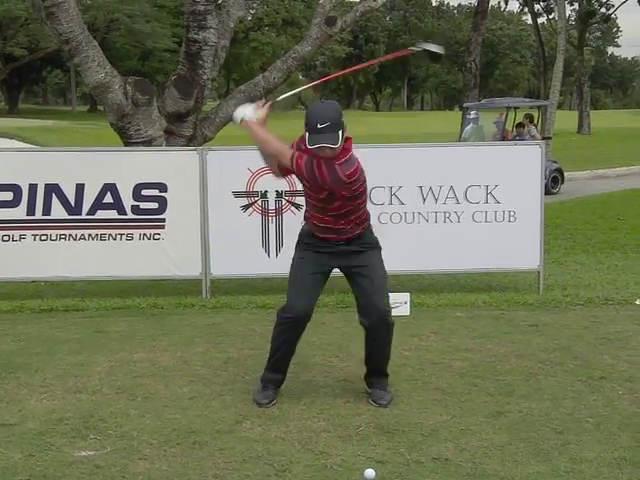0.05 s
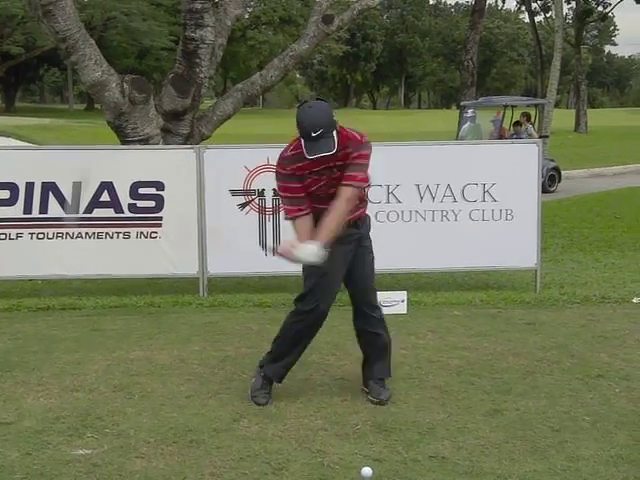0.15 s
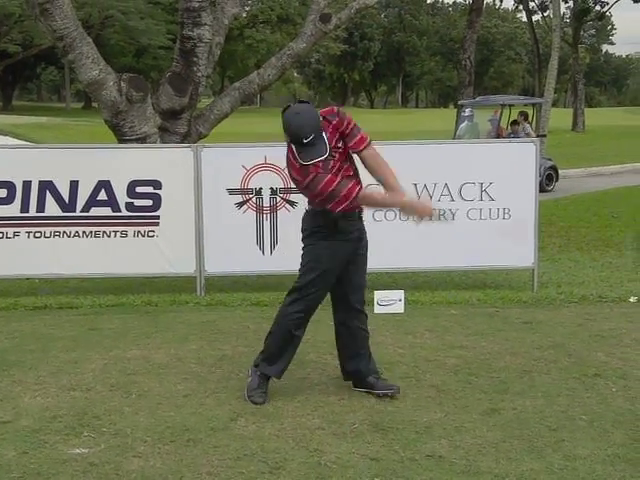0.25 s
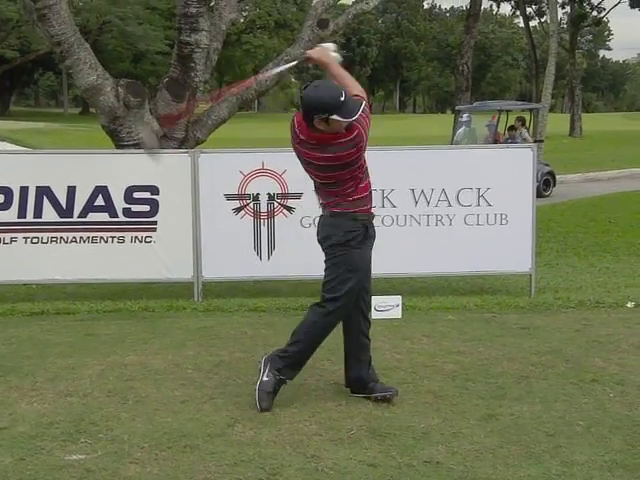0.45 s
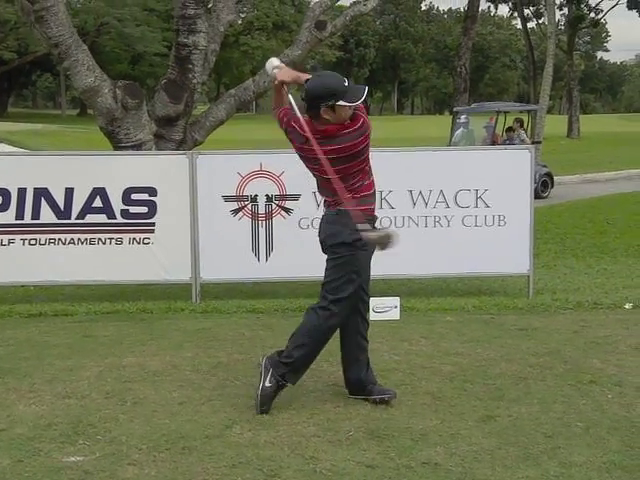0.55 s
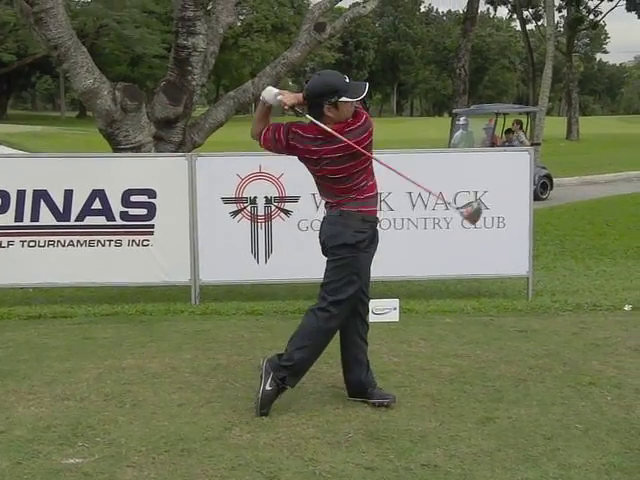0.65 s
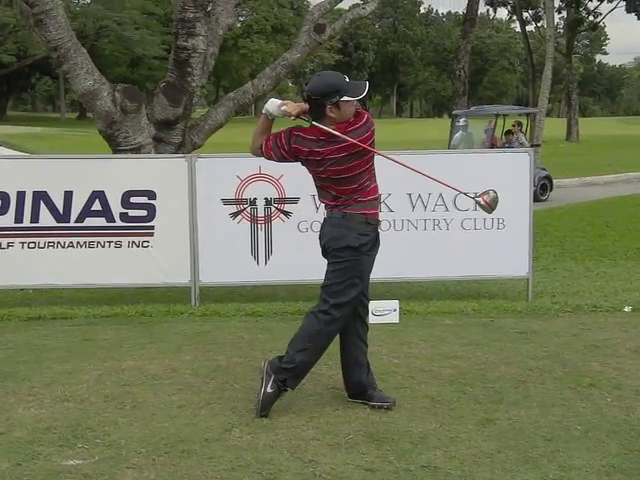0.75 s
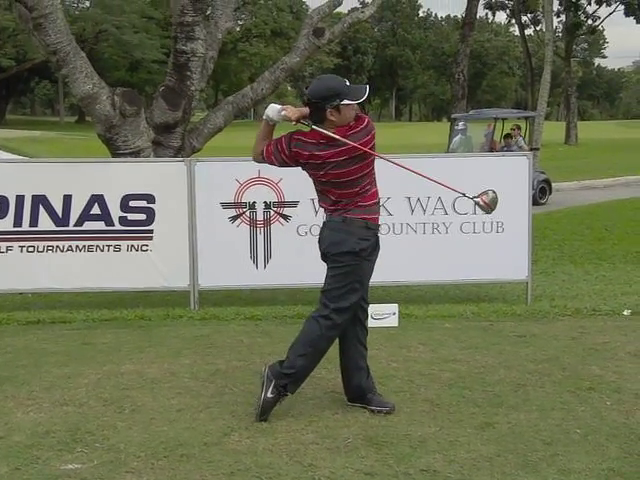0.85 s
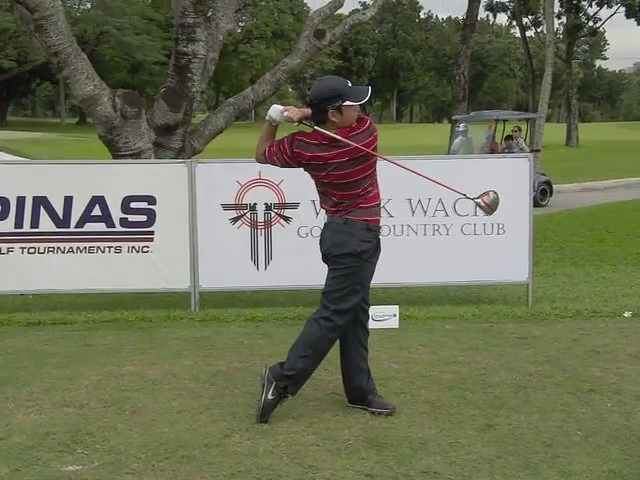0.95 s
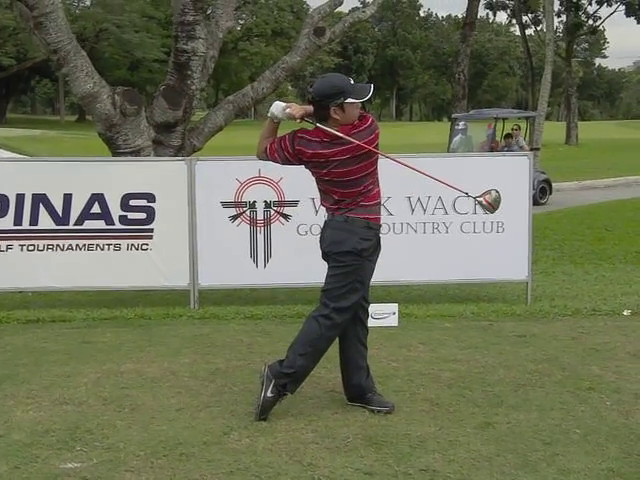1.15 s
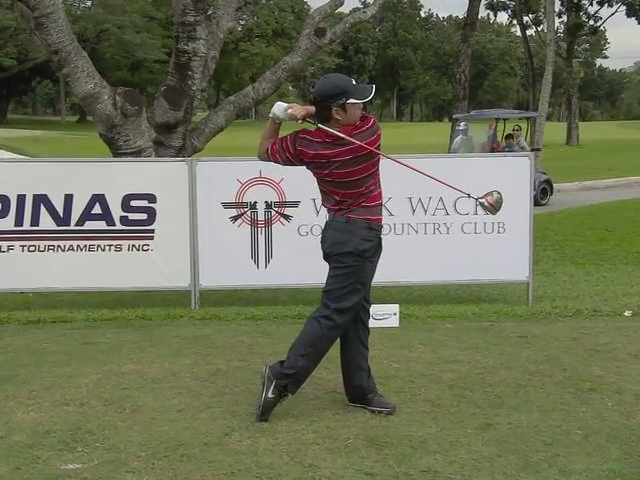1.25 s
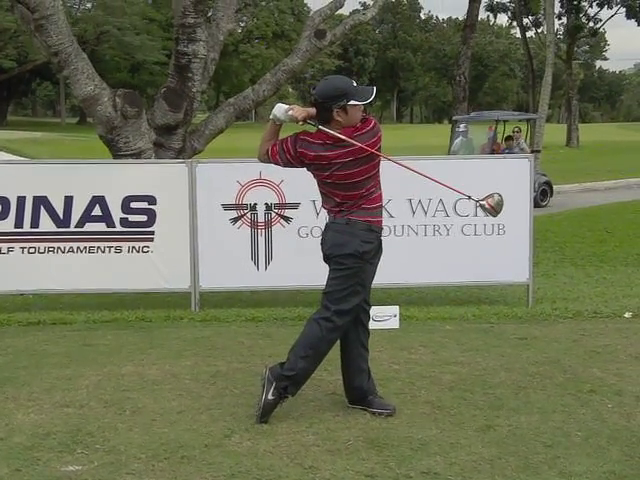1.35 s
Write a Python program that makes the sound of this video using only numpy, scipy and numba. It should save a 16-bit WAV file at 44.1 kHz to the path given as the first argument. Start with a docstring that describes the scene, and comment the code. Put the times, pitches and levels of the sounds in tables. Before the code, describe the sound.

One sharp crack of a golf drive outdoors, after a quick swish, over soft wind rumble.

```python
"""A golfer hits a drive on an open course. Light wind bumps the microphone over a faint outdoor hiss.
The shaft swishes down, shedding little swirls of air. The hollow metal head cracks against the ball
and rings briefly, overloading the microphone, and the automatic gain turns everything down.
Nearby boards slap the crack back, the trees return a short tail, and the wind carries on."""
import sys
import numpy as np
from scipy import signal
from scipy.fft import rfft, irfft
from scipy.io import wavfile
from numba import njit

SR = 44100
rng = np.random.default_rng(int(sys.argv[2]) if len(sys.argv) > 2 else 0)


def transcribe(signal):
    """Save signal, clipped to [-1, 1], as a 16-bit WAV file at the path in sys.argv[1]."""
    frames = np.atleast_2d(signal).T
    limited = np.clip(frames, -1, 1)
    pcm = np.round(limited * 32767).astype(np.int16)
    wavfile.write(sys.argv[1], SR, pcm)


N = 61739
TIME = np.arange(N) / SR
SPECTRUM_HZ = np.arange(N // 2 + 1) * SR / N
IMPACT_S = .2341

# The club head's ringing tones: pitch_hz, relative_db, fade_s (time to fall by 60 dB)
HEAD_TONES = [(1620, -17, .035), (3157, -20.5, .05), (3608, -3, 0.023), (4060, -12, 0.11), (5311, -23, .11),
              (6110, -14, 0.047), (6960, -41, .75), (7050, -20, .05), (7230, -23.5, .075),
              (9170, -19, .035), (9780, -16.5, .03), (10600, -24.5, .07), (10690, -5.5, .02),
              (13790, -21, .03), (14510, -6, 0.018)]
# Tone colour of the crack: pitch_hz, relative_db
CRACK_COLOUR = [(150, -10.5), (600, -7.5), (1600, -7.5), (2500, -9.5), (3600, 7.5), (5500, -7), (8000, -5),
                (10500, 1), (12800, -12), (15000, -2.5)]

def strike():
    """The ball cracks against the club face and sets the hollow head ringing."""
    ringing = sum((-1) ** k * from_db(db) * ring(IMPACT_S, hz, fade_s)
                  for k, (hz, db, fade_s) in enumerate(HEAD_TONES))
    crack = noise(CRACK_COLOUR) * burst(IMPACT_S, fade_s=.017, hold_s=.0022)
    return from_db(-1.5) * ringing + from_db(-4.5) * crack


# The swish as the club speeds up and slows: time_s, level_db, pitch_hz
SWING = [(.11, -79, 420), (.168, -60, 557), (.180, -49.5, 600), (.196, -41, 775), (.217, -31.5, 1050),
         (.232, -37.5, 900), (.26, -52.5, 610), (.33, -91, 400)]
# Churned air behind the head: pitch_hz, relative_db
WAKE_COLOUR = [(100, -9), (200, 0), (400, 0), (1000, 2.5), (2000, -2.5), (3600, -2.5), (5500, -21),
               (10000, -21), (15000, -25.5)]

def swish():
    """Air swirls off the shaft, higher and louder with speed; the slower inner part sounds lower."""
    time_s, level_db, pitch_hz = np.transpose(SWING)
    level = from_db(np.interp(TIME, time_s, level_db))
    hz = np.interp(TIME, time_s, pitch_hz)
    outer, inner = whistle(hz), whistle(.67 * hz)
    shaft = low_pass(outer + from_db(-5) * inner, 1500)
    return level * (shaft + from_db(-6.5) * noise(WAKE_COLOUR))


# Echoes off the boards round the tee: delay_s, gain_db, bass_edge_hz, treble_edge_hz
BOARD_ECHOES = [(0.0157, -2, 800, 12940), (.0212, -10, 795, 9890), (0.0268, 3.5, 1900, 3620)]

def board_slaps(hit):
    """Boards throw back the sharp front of the hit, later and with less bass and treble."""
    front = hit * burst(IMPACT_S, fade_s=.0068)
    slaps = np.zeros(N)
    for delay_s, gain_db, bass_edge_hz, treble_edge_hz in BOARD_ECHOES:
        echo = from_db(gain_db) * np.interp(TIME - delay_s, TIME, front)
        bass_cut = signal.butter(2, bass_edge_hz, "high", fs=SR, output="sos")
        slaps += low_pass(signal.sosfilt(bass_cut, echo), treble_edge_hz)
    return slaps


# Sound scattered by turf and trees: pitch_hz, relative_db, fade_s
SCATTER = [(400, -7.5, 0.26), (900, -5, .26), (1900, -4.5, 0.31), (2850, -2, .33), (4100, 4, 0.41),
           (5360, -5, .3), (6940, 1, .34), (7950, -3, .3), (10534, -1, 0.31), (12700, -11, 0.3),
           (15000, -7.5, .25)]

def scatter():
    """The hit scatters quickly round the tee, then leaves a tail where each band fades at its own rate."""
    rise_s = .0023
    spectrum = rfft(noise(SCATTER))
    edges_hz = np.geomspace(150, 17000, 25)
    tail = np.zeros(N)
    for low, high in zip(edges_hz, edges_hz[1:]):
        band = irfft(spectrum * ((SPECTRUM_HZ >= low) & (SPECTRUM_HZ < high)), N)
        fade_s = at_hz(SCATTER, np.sqrt(low * high), column=2)
        tail += band * burst(IMPACT_S, fade_s, rise_s)
    early = noise(SCATTER) * burst(IMPACT_S, fade_s=.11, rise_s=rise_s)
    return from_db(-22) * tail + from_db(-17) * early


# Echoes off the tree line: delay_s, level_db, fade_s, treble_edge_hz
TREE_ECHOES = [(0.069, -30.5, 0.11, 6900), (0.154, -48.5, 0.62, 6160), (.178, -47.5, 0.14, 16100),
               (.272, -60.5, 0.25, 14000)]
# Their tone colour: pitch_hz, relative_db
TREE_COLOUR = [(600, -16), (1900, -3), (3200, 1), (3900, 2.5), (4300, 7), (4800, -4), (6200, -15),
               (6900, 3.5), (7500, -11), (10500, -4.5), (15000, -22)]

def tree_echoes():
    """The trees return the hit as soft, late puffs of noise."""
    return sum(from_db(db) * low_pass(noise(TREE_COLOUR), edge_hz)
               * burst(IMPACT_S + delay_s, fade_s, rise_s=.0062)
               for delay_s, db, fade_s, edge_hz in TREE_ECHOES)


# Swirls of wind hitting the microphone: time_s, level_db, pitch_hz
WIND_BUMPS = [(.006, -38, 151), (0.0458, -29, 352), (.072, -35.5, 244), (0.0926, -27.5, 245),
              (.105, -31.5, 165), (0.111, -35, 466), (.1465, -37, 181), (.192, -37, 166), (.200, -30, 170),
              (0.345, -33, 169), (0.403, -30, 272), (.446, -49, 270), (0.487, -29, 212),
              (0.6103, -25.5, 350), (.634, -35, 171.5), (0.656, -40.5, 314), (0.7143, -26.5, 194),
              (0.716, -32, 530), (.757, -33.5, 440), (.772, -34.5, 420), (.785, -38, 432),
              (.980, -32.5, 200), (1.019, -30.5, 196), (1.072, -36.5, 377), (1.264, -37, 172),
              (1.298, -33.5, 200), (1.311, -37.5, 392)]

def wind_bumps():
    """Each swirl gives the microphone one smooth push and pull."""
    bumps = np.zeros(N)
    for time_s, level_db, pitch_hz in WIND_BUMPS:
        cycles = (TIME - time_s) * pitch_hz
        swell = np.exp(-.5 * (cycles / .29) ** 2)
        bumps -= from_db(level_db) * swell * np.sin(2 * np.pi * cycles)
    return low_pass(bumps, 710)


# Tone colour of the wind: pitch_hz, relative_db
RUMBLE_COLOUR = [(25, -18.5), (45, -9.5), (75, -0.5), (130, 3.5), (200, 1.5), (290, -3), (420, -15),
                 (650, -22.5), (1200, -41.5)]
# The wind's rise and fall: time_s, level_db
WIND_STRENGTH = [(0, -43.5), (.11, -48.5), (.16, -52), (.33, -50), (.56, -47.5), (.69, -58), (.77, -44),
                 (.9, -50.5), (1.15, -46.5), (1.3, -48.5), (1.4, -45.5)]

def wind_rumble():
    """Wind rumbles on the microphone, its level fluttering at random."""
    rumble = noise(RUMBLE_COLOUR)
    level_db = np.interp(TIME, *np.transpose(WIND_STRENGTH))
    flutter_db = 2.2 * unit_level(low_pass(rng.standard_normal(N), 35))
    return from_db(level_db + flutter_db) * rumble


# Tone colour of the hiss: pitch_hz, relative_db
HISS_COLOUR = [(200, 0), (600, 3.5), (1200, -0.5), (2200, -4.5), (4200, -7), (5500, -19.5), (7000, -15),
               (9000, -18), (15000, -21.5)]

def outdoor_hiss():
    """A faint, steady hiss from far away."""
    return from_db(-58.5) * noise(HISS_COLOUR)


def from_db(db):
    """Turn decibels into a multiplier."""
    return 10 ** (np.asarray(db) / 20)


def unit_level(x):
    """Scale to an average (rms) level of 1."""
    return x / np.sqrt(np.mean(x ** 2) + 1e-20)


def at_hz(points, hz, column=1):
    """Read between a table's rows, with octaves evenly spaced."""
    table = np.array(points)
    return np.interp(np.log(np.maximum(hz, 1)), np.log(table[:, 0]), table[:, column])


def noise(colour):
    """Noise of the given tone colour, at level 1."""
    white = rfft(rng.standard_normal(N))
    return unit_level(irfft(white * from_db(at_hz(colour, SPECTRUM_HZ)), N))


def low_pass(x, hz):
    """Soften the treble above hz."""
    return signal.sosfilt(signal.butter(2, min(hz, .45 * SR), fs=SR, output="sos"), x)


def burst(start_s, fade_s, rise_s=1 / SR, hold_s=0):
    """A loudness shape: rise, hold, then fall 60 dB in fade_s."""
    rise = np.clip((TIME - start_s) / rise_s, 0, 1)
    falling_s = np.maximum(TIME - start_s - rise_s - hold_s, 0)
    return rise * np.exp(-np.log(1000) * falling_s / fade_s)


def ring(start_s, hz, fade_s):
    """One struck tone dying away."""
    return burst(start_s, fade_s) * np.sin(2 * np.pi * hz * (TIME - start_s))


def whistle(hz, width_hz=100):
    """Breathy noise around a gliding pitch."""
    feedback = np.exp(-np.pi * width_hz / SR)
    return unit_level(moving_resonance(rng.standard_normal(N), 2 * np.pi * hz / SR, feedback))


@njit
def moving_resonance(x, angle, feedback):
    """A ringing filter whose pitch moves."""
    y = np.zeros(len(x))
    for i in range(2, len(x)):
        y[i] = x[i] - x[i - 2] + 2 * feedback * np.cos(angle[i]) * y[i - 1] - feedback ** 2 * y[i - 2]
    return y


def scene():
    """Swing, hit and echoes over wind and distant hiss."""
    hit = strike()
    shot = hit + swish() + board_slaps(hit) + scatter() + tree_echoes()
    return (shot + wind_bumps() + wind_rumble() + outdoor_hiss())[None]


def gain_control(x, boost_db=6, threshold_db=-10.5, max_cut_db=7.5, react_s=.0016, recover_db_per_s=1):
    """A loud peak turns the gain down within milliseconds; it creeps back slowly."""
    over_db = np.clip(20 * np.log10(np.abs(x) + 1e-9) - threshold_db, 0, max_cut_db)
    recovery_db = recover_db_per_s * TIME
    held_db = np.maximum.accumulate(over_db + recovery_db, axis=-1) - recovery_db
    lag = np.exp(-1 / (react_s * SR))
    cut_db = signal.lfilter([1 - lag], [1, -lag], held_db)
    return x * from_db(boost_db - cut_db)


# Narrow bands the microphone picks up weakly: pitch_hz, width_hz, gain_db
MIC_DIPS = [(2707, 420, -16.5), (4977, 450, -24.5), (5710, 340, -13.5), (7850, 440, -14)]

def record(dry):
    """The microphone dulls a few bands; the gain drops too late for the crack, which overloads."""
    for pitch_hz, width_hz, gain_db in MIC_DIPS:
        notched = signal.lfilter(*signal.iirnotch(pitch_hz, pitch_hz / width_hz, fs=SR), dry)
        dry = notched + from_db(gain_db) * (dry - notched)
    ceiling, cutoff_hz = .7, 15550
    overloaded = ceiling * np.tanh(gain_control(dry) / ceiling)
    treble_cut = signal.ellip(9, .2, 90, cutoff_hz, fs=SR, output="sos")
    return signal.sosfilt(treble_cut, overloaded)


dry = scene()
out = record(dry)
transcribe(out)
```